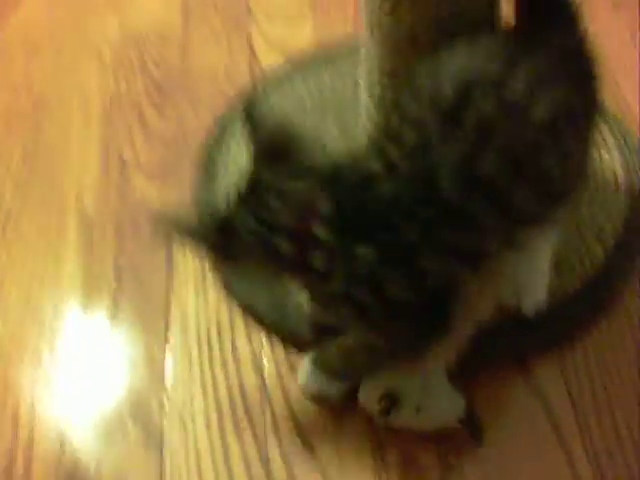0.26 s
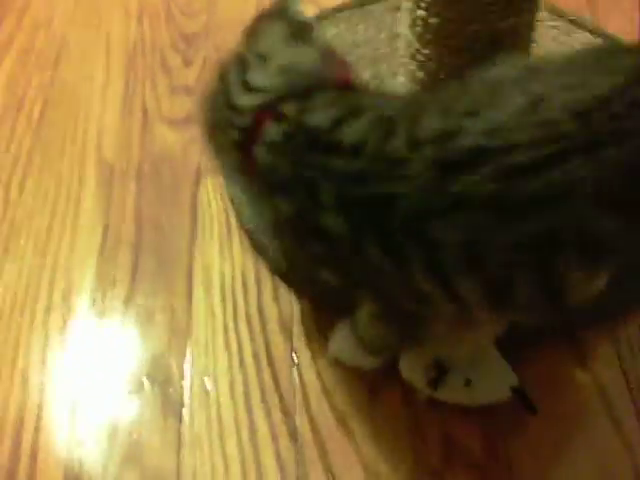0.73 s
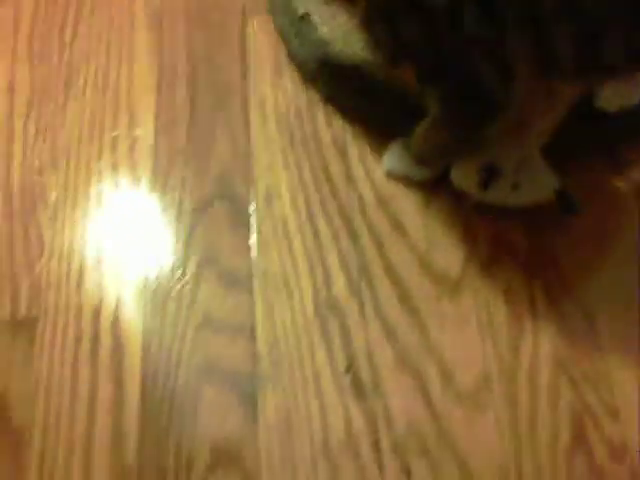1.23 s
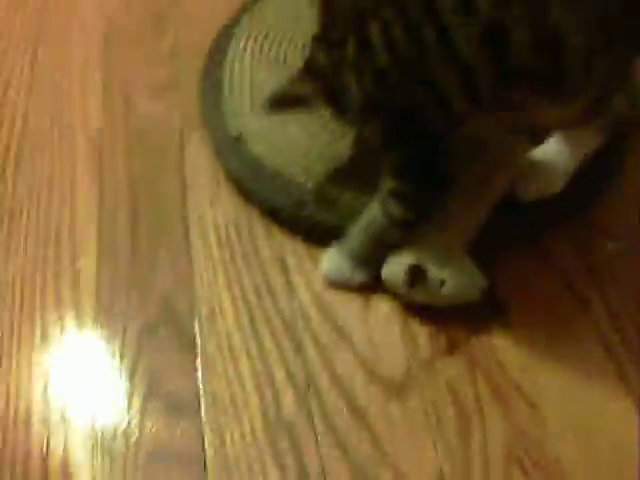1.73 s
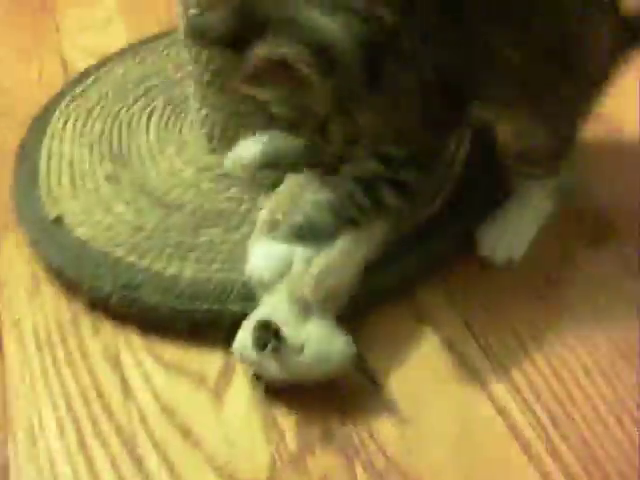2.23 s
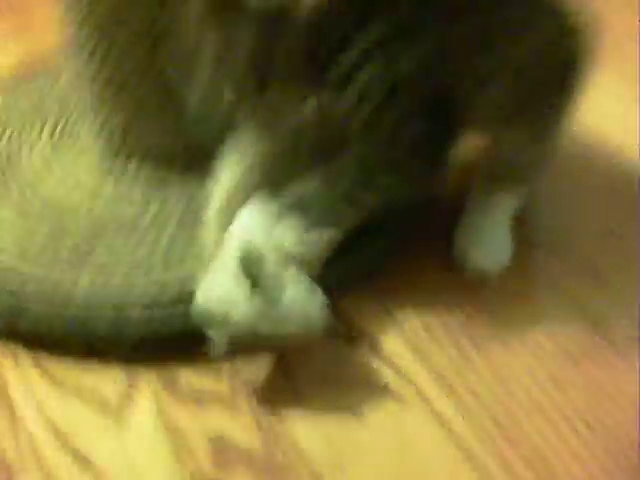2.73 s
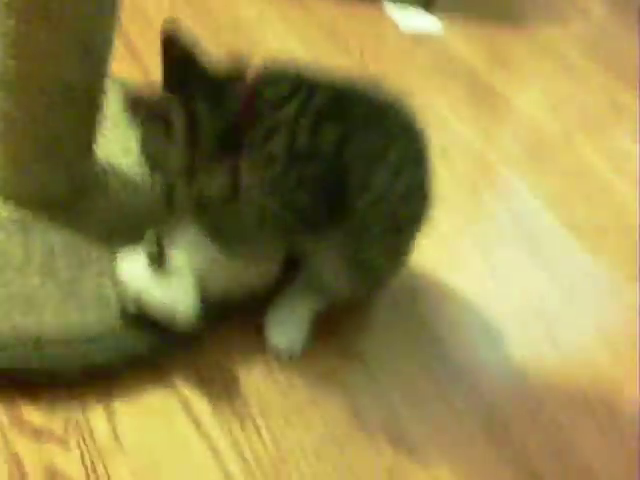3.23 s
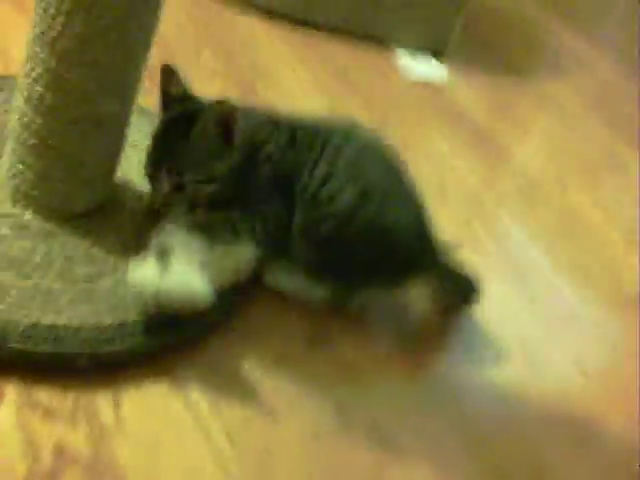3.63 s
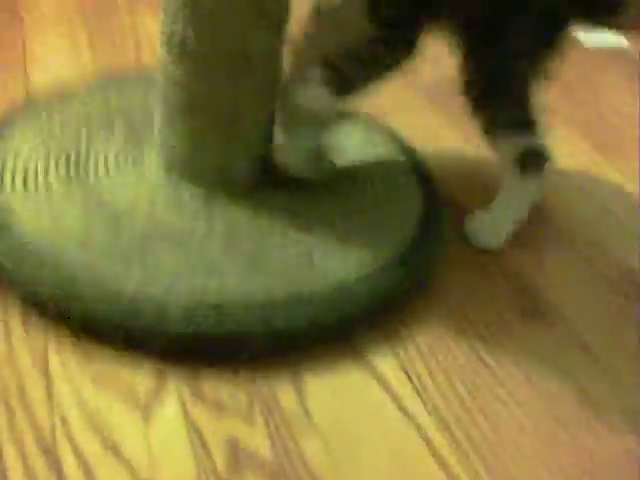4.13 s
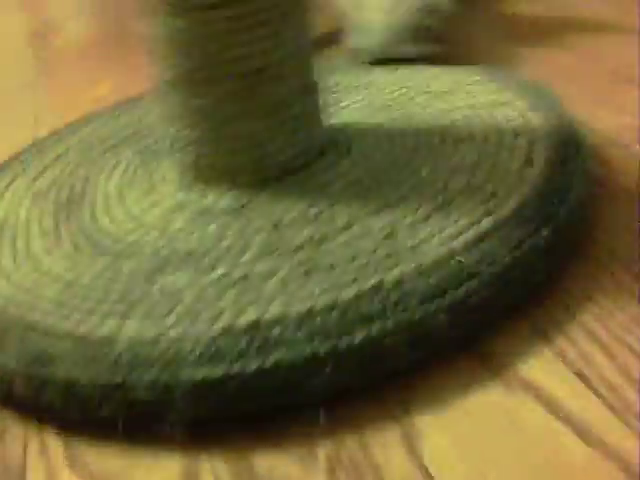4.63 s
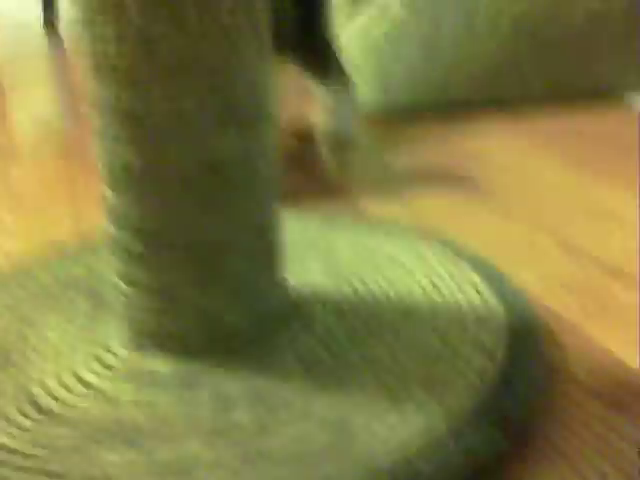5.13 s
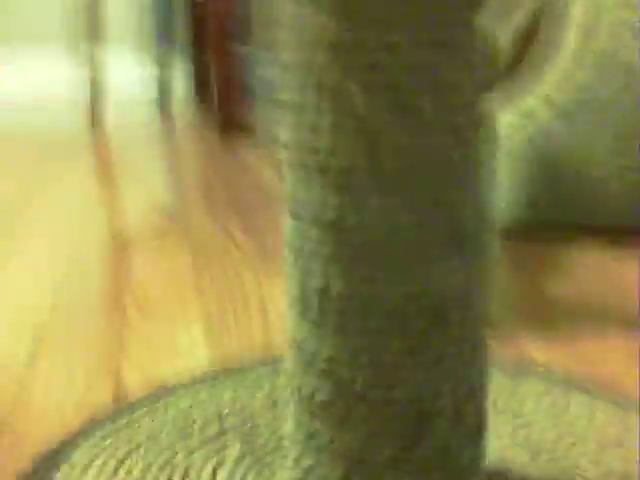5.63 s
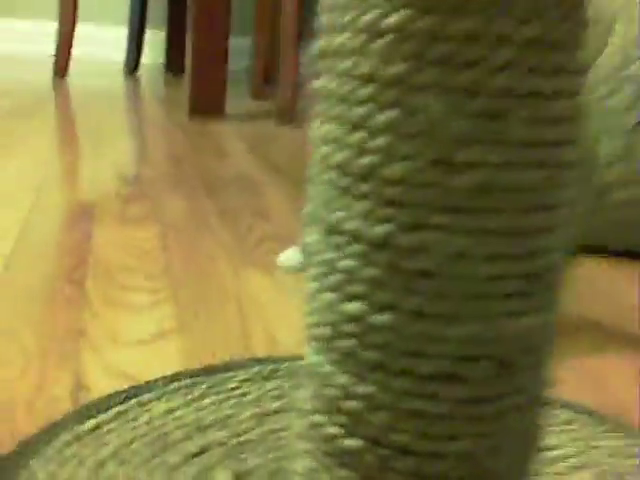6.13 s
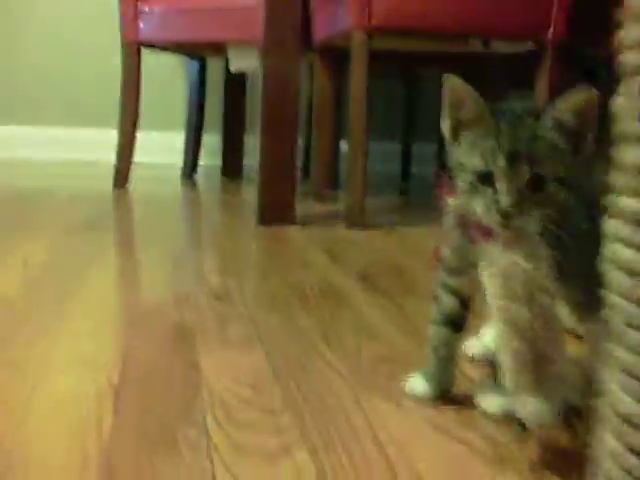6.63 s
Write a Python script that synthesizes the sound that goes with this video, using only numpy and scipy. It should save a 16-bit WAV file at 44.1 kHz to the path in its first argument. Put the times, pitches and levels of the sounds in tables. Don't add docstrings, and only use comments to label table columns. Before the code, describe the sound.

Indoors on a hardwood floor, a kitten plays round a rope post. A thin collar bell jingles over steady hiss and hand rumble, then claws tick and scrape, with harsh snaps near two, three and nearly five seconds. Soft paw thuds and dull case knocks fill the gaps. The cheap close microphone sounds narrow, ringing, and clips on the hardest hits.

```python
import sys
import numpy as np
from scipy import signal
from scipy.fft import rfft, irfft, next_fast_len
from scipy.io import wavfile
from scipy.ndimage import uniform_filter1d, map_coordinates

SR = 44100
rng = np.random.default_rng(int(sys.argv[2]) if len(sys.argv) > 2 else 0)


def invert_db(x):
    u = np.asarray(x, float) / 20
    return 10 ** u


def store_pcm(level_fs):
    pcm = np.round(np.clip(level_fs, -1, 1) * 32767).astype(np.int16)
    wavfile.write(sys.argv[1], SR, np.atleast_2d(pcm).T)


N = 302967


def unit(x):
    return x / np.sqrt(np.mean(x ** 2) + 1e-20)


def peaked(x):
    return x / np.abs(x).max()


def along(points, hz):
    f, v = np.transpose(points)
    return np.interp(np.log(hz + 1), np.log(f + 1), v)


def filtered(x, response):
    m = next_fast_len(len(x) + 2048)
    return irfft(rfft(x, m) * response(np.fft.rfftfreq(m, 1 / SR)), m)[:len(x)]


def ringing(x, modes):
    def response(f):
        total = 0
        for k, (centre, width, db) in enumerate(modes):
            damping = 1j * f * width
            total = total + (-1) ** k * invert_db(db) * damping / (centre * centre - f * f + damping)
        return total
    return filtered(x, response)


def wobble(rate):
    knots = rng.standard_normal(int(N * rate / SR) + 4)
    return map_coordinates(knots, [np.arange(N) * rate / SR])


def noise(spectrum):
    return unit(filtered(rng.standard_normal(N), lambda hz: invert_db(along(spectrum, hz))))


def add(track, s, sound):
    part = track[round(s * SR):][:len(sound)]
    part += sound[:len(part)]


# (centre [Hz], width [Hz], level [dB])
CASE_MID = [(1320, 525, 0), (2550, 377, 6), (3307, 120, 2.5)]
CASE_TOP = [(4150, 750, -2.5), (4840, 340, 4), (6220, 450, -11)]


def contact(out, s, push_db, ring_db, ring_hz, snap_db):
    lead = .004
    t = np.arange(SR // 10) / SR - lead
    after, before = np.maximum(t, 0), np.minimum(t, 0)
    grit = rng.standard_normal((3, len(t)))
    t60 = .036 * invert_db(-.24 * (ring_db + 38))
    fade = invert_db(-60 * after / max(t60, .004))

    push = np.exp(-(t / .00033) ** 2) - .2 * np.exp(-((t - .0025) / .0022) ** 2)

    partials = np.cos(2 * np.pi * ring_hz * t) + .36 * np.cos(2 * np.pi * 1.62 * ring_hz * t)
    ring_fade = invert_db(-60 * after * ring_hz / 22)
    ring = ring_fade * np.exp(-(before / .00018) ** 2) * partials

    late = .0015 * (ring_hz < 900)
    burst = np.exp(-np.abs((t - late) / np.where(t < late, .0008, .0013)) ** 3)
    rattle = invert_db(-12) * fade * (t > late)
    strike = (np.exp(-(t / .00052) ** 2) + rattle) * grit[0] - .6 * np.exp(-(t / .00006) ** 2)
    click = peaked(ringing(strike, CASE_MID))
    grains = peaked(ringing((burst + rattle) * grit[1], CASE_TOP))
    whistle = burst * np.sin(2 * np.pi * (5050 + 130 * grit[2, 0]) * t)
    snap = .58 * whistle + .5 * grains

    sound = invert_db(push_db + 6.5) * push + invert_db(ring_db) * (.57 * ring + .65 * click) + invert_db(snap_db) * snap
    add(out, s - lead, sound)


# (time [s], ring level [dB], ring pitch [Hz], snap level [dB])
TICKS = [(0.6862, -33, 1560, -60), (1.3362, -36, 2160, -47), (1.4106, -33.5, 2580, -39),
         (1.5557, -34, 2780, -33.5), (1.637, -37, 3100, -35.5), (1.7485, -31, 2910, -21.5),
         (1.78, -39, 2500, -21), (1.801, -20.5, 1350, -9), (1.8439, -4, 2565, 2),
         (1.8515, -21.5, 2650, -21), (2.0906, -34, 2380, -50), (2.2732, -33, 3140, -42),
         (2.321, -35.5, 1590, -49), (2.5347, -36, 1240, -32), (2.559, -36.5, 1260, -38),
         (2.5925, -40.5, 1210, -38), (2.6988, -33.5, 2580, -35.5), (3.1134, -2.5, 2610, 0),
         (3.595, -27, 1540, -27.5), (3.9027, -31.5, 2160, -34), (3.9886, -37.5, 2640, -33.5),
         (4.7478, -35, 2570, -17.5), (4.7602, -16.5, 2152, -8), (4.7731, -24, 2520, -4),
         (4.7755, -22.5, 2550, -9), (6.538, -36, 2640, -38)]


def claw_ticks():
    out = np.zeros(N)
    for s, ring_db, ring_hz, snap_db in TICKS:
        contact(out, s, ring_db - 16, ring_db, ring_hz, snap_db)
    return out


# (time [s], push [dB], ring [dB], snap [dB])
KNOCKS = [(0.6843, -41, -31, -56), (1.539, -40, -44.5, -55), (2.1566, -33, -54, -51),
          (3.1705, -32.5, -18.5, -27), (3.3651, -44.5, -38.5, -51), (3.622, -27.5, -23.5, -30),
          (3.631, -34.5, -32, -30), (3.6528, -30, -34, -18.5), (3.655, -33, -17, -13),
          (3.7087, -28, -26, -29), (3.7115, -34.5, -25.5, -30), (3.7383, -36, -46, -55),
          (3.7468, -30.5, -39, -29.5), (4.2366, -38.5, -36, -42.5), (4.2769, -47, -39.5, -42),
          (4.573, -34, -32, -39.5), (4.6942, -44, -47, -55), (4.7135, -20.5, -18, -27),
          (4.7945, -28, -29.5, -33), (4.9221, -21, -25, -31), (4.937, -22, -31, -34),
          (5.0026, -38.5, -41.5, -51), (5.2908, -35, -42, -51.5), (5.5948, -34.5, -24.5, -25.5),
          (6.2066, -22, -21, -18.5), (6.2494, -21, -24, -30), (6.2884, -21.5, -26.5, -28),
          (6.3162, -20, -20, -23), (6.8223, -34, -38, -48)]


def case_knocks():
    out = np.zeros(N)
    for s, push_db, ring_db, snap_db in KNOCKS:
        contact(out, s, push_db, ring_db, 802, snap_db)
    return out


# (time [s], snap level [dB])
PLUCKS = [(0.2005, -35), (1.3892, -34), (1.6261, -43), (2.186, -39.5), (3.0368, -37), (3.5262, -36.5),
          (3.5686, -29.5), (3.794, -33), (3.891, -35), (4.9559, -26.5), (5.2564, -33), (5.27, -28.5),
          (5.2762, -28.5), (5.535, -34.5), (5.5849, -41)]


def rope_plucks():
    out = np.zeros(N)
    for s, snap_db in PLUCKS:
        contact(out, s, snap_db - 25, snap_db - 21.5, 2600, snap_db)
    return out


# (time [s], peak level [dB], 60 dB decay [s])
BELL_HITS = [(0.3182, -58, 0.1), (0.4044, -46.5, 0.094), (0.479, -45.5, 0.13), (0.5389, -43, 0.1),
             (0.5594, -49, 0.093), (0.623, -41.5, 0.13), (0.7399, -40, 0.052), (0.8036, -43.5, 0.062),
             (1.9083, -48, 0.088), (2.0093, -41, 0.054), (2.0682, -47.5, 0.062), (2.119, -46, 0.05),
             (2.2732, -53, 0.15), (2.4094, -45.5, 0.053), (2.819, -51.5, 0.1), (2.893, -36, 0.056),
             (2.984, -45.5, 0.065), (3.0555, -38, 0.12), (3.3803, -47, 0.094), (3.4144, -35.5, 0.075),
             (3.5846, -47.5, 0.11), (3.5932, -37, 0.12), (3.6401, -32.5, 0.11), (3.684, -51, 0.092),
             (3.7204, -33.5, 0.036), (3.8088, -35.5, 0.082), (4.023, -43.5, 0.086), (4.112, -47.5, 0.084),
             (4.475, -42.5, 0.097), (4.496, -38.5, 0.2)]
# (pitch [Hz], level [dB])
BELL = [(5170, -1.5), (5520, -19.5), (5860, -11.5)]


def bell():
    out, rolling, t = np.zeros(N), np.zeros(N), np.arange(SR // 4) / SR
    bend = np.cumsum(40 * wobble(60)) / SR
    for s, db, t60 in BELL_HITS:
        luck = rng.standard_normal((len(BELL), 2))
        fade = invert_db(db - 60 * t / max(t60, .01)) * (1 - np.exp(-t / .00084))
        add(rolling, s, fade)
        for (hz, level_db), (louder, sharper) in zip(BELL, luck):
            turns = (hz + 25 * sharper) * t + bend[round(s * SR):][:len(t)]
            add(out, s, invert_db(level_db + louder) * fade * np.sin(2 * np.pi * turns))
    grit = unit(ringing(rng.standard_normal(N), [(hz, 220, db) for hz, db in BELL]))
    return (out + .53 * rolling * grit) * invert_db(2.2 * wobble(190))


# (peak time [s], rise [s], fall [s], peak level [dB], body under it [dB])
SWIPES = [(1.454, 0.12, 0.12, -40, -9.5), (1.634, 0.085, 0.082, -49.5, -11),
          (1.792, 0.048, 0.02, -36.5, -10), (1.839, 0.0087, .006, -34, -5), (2.09, 0.36, 0.33, -58, 1.5),
          (2.25, 0.18, 0.34, -62, 1), (2.665, 0.074, 0.065, -49, -13), (2.735, 0.072, 0.058, -35.5, -17),
          (3.165, 0.1, .02, -50, 5), (3.66, 0.027, 0.03, -39, -9), (4.25, 0.2, 0.24, -49.5, -3.5),
          (4.45, 0.17, 0.069, -48, -1.5), (4.579, 0.035, 0.093, -39, -2.5), (4.774, 0.05, 0.023, -22.5, -6),
          (4.956, 0.071, 0.051, -42.5, -13), (5.37, 0.25, 0.26, -58, 5.5), (5.822, 0.088, 0.17, -47, -29.5),
          (6.54, 0.024, 0.041, -49.5, -7.5)]
# (time [s], fall [s], peak level [dB], body under it [dB])
DRAGS = [(1.753, .11, -39, -9.5), (3.594, 0.041, -49, 5), (3.627, 0.012, -38, 3), (3.75, 0.039, -45.5, -8),
         (6.21, 0.022, -36.5, -2.5), (6.255, 0.016, -42.5, -10), (1.697, 0.036, -38, -16),
         (1.805, .045, -56, -6), (1.856, 0.052, -46, -5.5), (3.178, 0.28, -42, -2), (3.707, 0.15, -58, -16),
         (3.882, 0.56, -52, -6.5), (4.719, 0.031, -34, 0), (4.8, 0.1, -44, -3), (5.022, 0.082, -50, -6),
         (5.6, 0.072, -44, -7.5)]
# (centre [Hz], width [Hz], level [dB])
RASP = [(3333, 610, -7)]
CASE_LOW = [(770, 44, -2.5), (496, 620, -6.5)]


def scrapes():
    t, gains = np.arange(N) / SR, np.zeros((3, N))
    drags = [(s, .0097, *rest) for s, *rest in DRAGS]
    for s, rise, fall, db, body_db in SWIPES + drags:
        near = slice(round((s - rise) * SR), round((s + fall) * SR))
        distance = np.abs((t[near] - s) / np.where(t[near] < s, rise, fall))
        loss = 25.5 * distance ** .97
        layers_db = [-loss, body_db - loss, -2 + .77 * body_db - loss]
        gains[:, near] += invert_db(db + np.array(layers_db))
    gains = uniform_filter1d(gains, size=180)
    clumps = invert_db(3 * wobble(300) + 1.5 * wobble(60))
    layers = (CASE_TOP + RASP, CASE_MID, CASE_LOW)
    grains = [unit(ringing(clumps * rng.standard_normal(N), modes)) for modes in layers]
    return np.sum(gains * grains, axis=0)


def swings(rows, attack):
    out, t = np.zeros(N), np.arange(SR // 2) / SR
    for s, db, hz, t60 in rows:
        fade = invert_db(db + 10 - 60 * t / max(t60, .02)) * (1 - np.exp(-t / attack))
        add(out, s, fade * np.sin(2 * np.pi * hz * t))
    return out


# (time [s], peak level [dB], pitch [Hz], 60 dB decay [s])
THUDS = [(2.15, -37, 334, 0.074), (5.285, -36, 164, 0.14), (1.265, -37, 264, 0.08),
         (2.161, -37, 124.4, 0.16), (2.29, -33.5, 132.5, 0.15), (2.929, -34, 151, 0.13),
         (2.948, -25.5, 99, 0.081), (3.188, -32, 207.4, 0.13), (3.363, -32.5, 130.2, 0.18),
         (4.506, -42, 155, 0.18), (5.282, -35, 98.5, 0.12), (5.309, -34, 99, 0.22)]


def paw_thuds():
    return swings(THUDS, attack=.022)


# (time [s], peak level [dB], pitch [Hz], 60 dB decay [s])
HEAVES = [(1.33, -40, 41.8, .2), (5.6, -36.5, 62.6, .12), (5.86, -33.5, 46, 0.14), (1.803, -37, 22.6, 0.51),
          (1.847, -24, 24, 0.13), (2.689, -32.5, 21.5, 0.13), (2.91, -33.5, 21.8, 0.16),
          (2.97, -29.5, 21.7, 0.28), (3.618, -30, 51, 0.15), (3.709, -33, 48, 0.13),
          (3.998, -32.5, 22.2, 0.41), (4.728, -18, 20.4, 0.39), (4.919, -51, 29.9, 0.15),
          (5.288, -24.5, 54.7, 0.1), (5.35, -36, 49.7, 0.32), (5.588, -35.5, 21.9, 0.26),
          (5.839, -45, 21.5, 0.21), (6.525, -35.5, 40, 0.29)]


def hand_heaves():
    return swings(HEAVES, attack=.0076)


# (time [s], length [s], pitch [Hz], level [dB])
SQUEAKS = [
    (.28, .16, 3750, -62),
    (.88, .2, 3500, -62),
    (2.115, .04, 3970, -52),
    (2.27, .11, 1510, -55),
    (0, 6.87, 4070, -72),
]


def squeaks():
    out = np.zeros(N)
    for s, length, hz, db in SQUEAKS:
        t = np.arange(round(length * SR)) / SR
        drift = np.cumsum(25 * wobble(25)[:len(t)]) / SR
        swell = invert_db(db + 3.2 * wobble(30)[:len(t)]) * np.sin(np.pi * t / length) ** .35
        add(out, s, swell * np.sin(2 * np.pi * (hz * t + drift)))
    return out


# (time [s], level [dB])
HAND = [(0.0, -44), (0.42, -51), (1.84, -44), (1.89, -50.5), (2.64, -48.5), (3.12, -40.5), (3.48, -45.5),
        (4.59, -42.5), (4.8, -31), (5.01, -47.5), (5.87, -46), (6.87, -43)]
# (frequency [Hz], density [dB per Hz])
RUMBLE = [(4.7, -38.5), (8.0, -2.5), (16, -21.5), (20, -6.5), (27, -3), (90, -22), (120, -66.5),
          (200, -120)]
DRONE = [(35, -39), (60, 4), (182, -3.5), (273, -8.5), (301, -11.5), (400, -15), (520, -41), (880, -120)]
HISS = [(150, -38.5), (260, -4.5), (700, -10), (2840, -17), (4750, -15), (5900, -29.5), (6400, -66.5),
        (9000, -120)]


def background():
    s, db = np.transpose(HAND)
    motion_db = np.interp(np.arange(N) / SR, s, db - np.median(db))
    grip = wobble(9)
    rumble_db = np.minimum(-43 + motion_db, -39) + 2.7 * grip
    drone_db = -49 + .32 * motion_db + 1.9 * grip + 1.3 * wobble(14)
    hiss_db = -53 + wobble(7) + wobble(30)
    return invert_db(hiss_db) * noise(HISS) + invert_db(rumble_db) * noise(RUMBLE) + invert_db(drone_db) * noise(DRONE)


def scene():
    contacts = claw_ticks() + case_knocks() + rope_plucks()
    lows = paw_thuds() + hand_heaves()
    return (contacts + bell() + scrapes() + lows + squeaks() + background())[None]


# (frequency [Hz], level [dB])
EDGE = [(5700, -0.5), (6050, -12), (6350, -33.5), (6700, -59.5), (7500, -84.5)]


def microphone(x):
    x = filtered(x, lambda hz: invert_db(along(EDGE, hz)))
    x = x / (1 + np.abs(x / .72) ** 14) ** (1 / 14)
    return filtered(x, lambda hz: np.clip((16700 - hz) / 900, 0, 1)) + .02


def top_cut(x):
    return signal.sosfilt(signal.butter(12, 16880, fs=SR, output="sos"), x)


def record(dry):
    mix = microphone(dry[0])[None]
    return top_cut(mix)


dry = scene()
out = record(dry)
store_pcm(out)
```